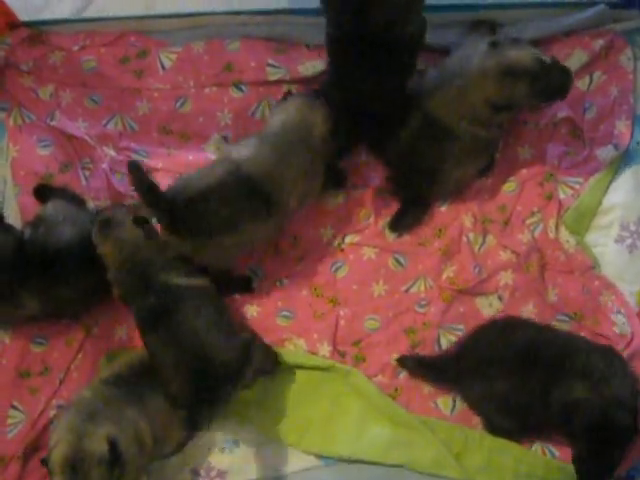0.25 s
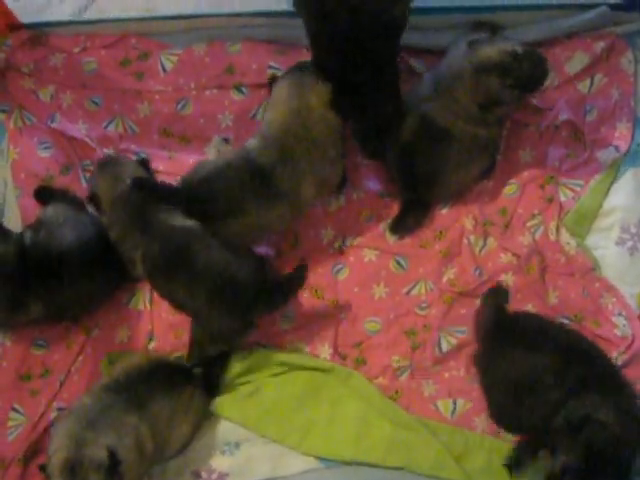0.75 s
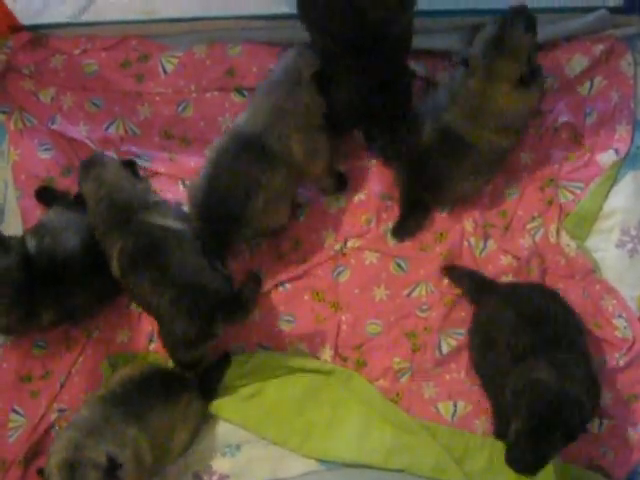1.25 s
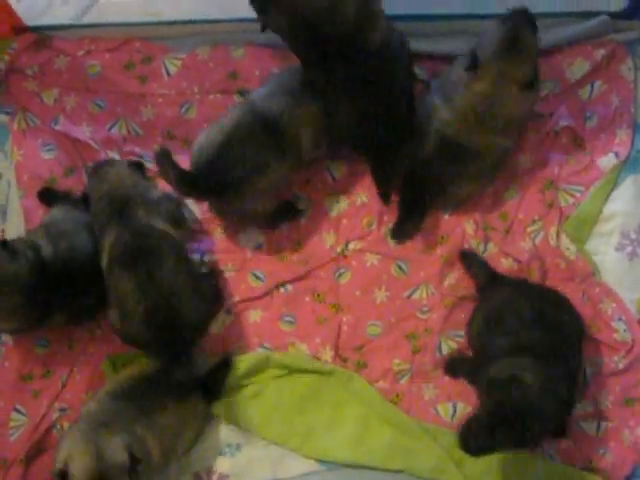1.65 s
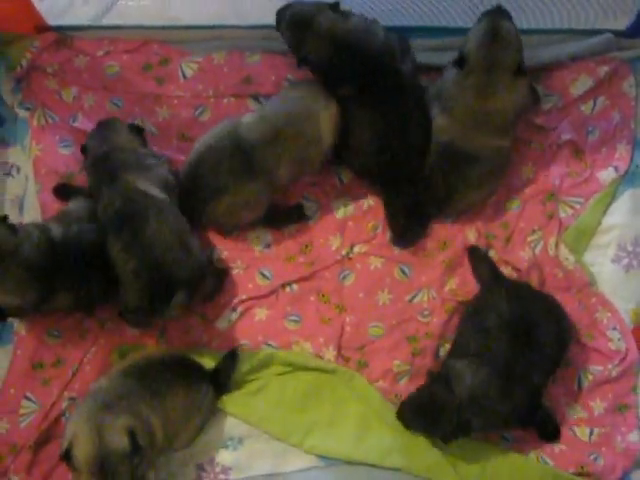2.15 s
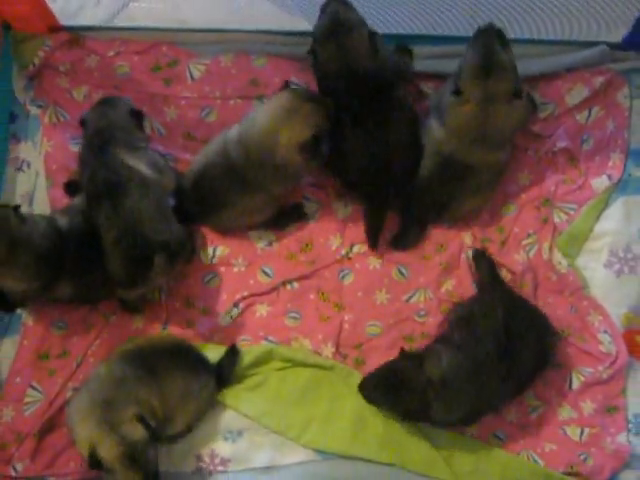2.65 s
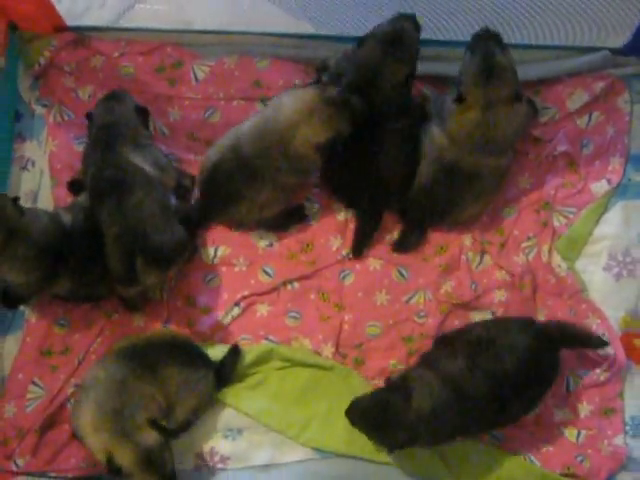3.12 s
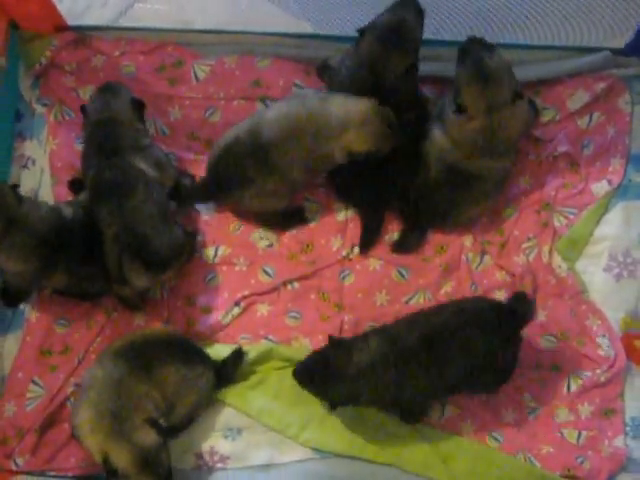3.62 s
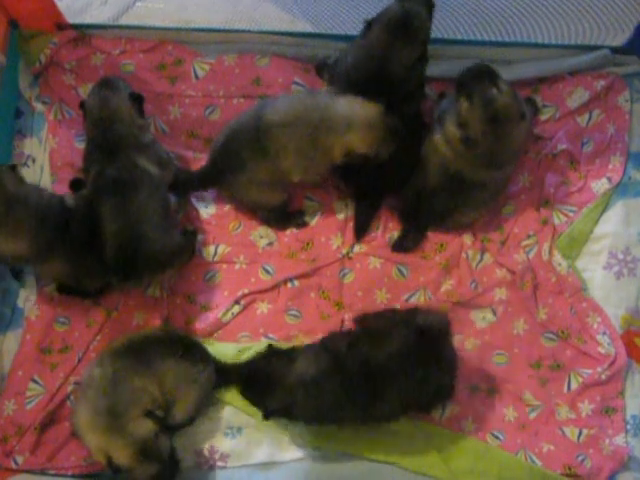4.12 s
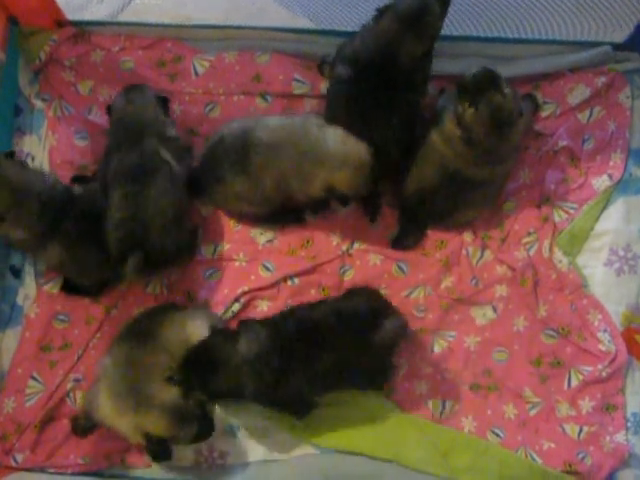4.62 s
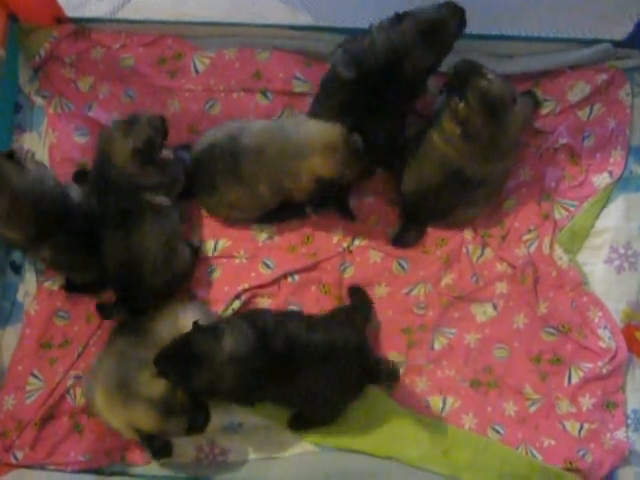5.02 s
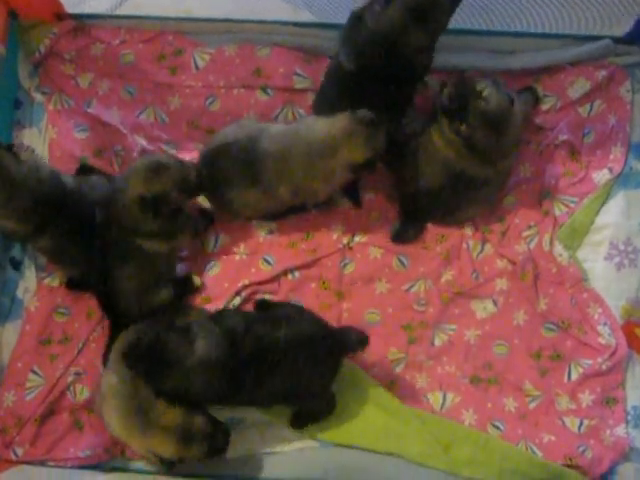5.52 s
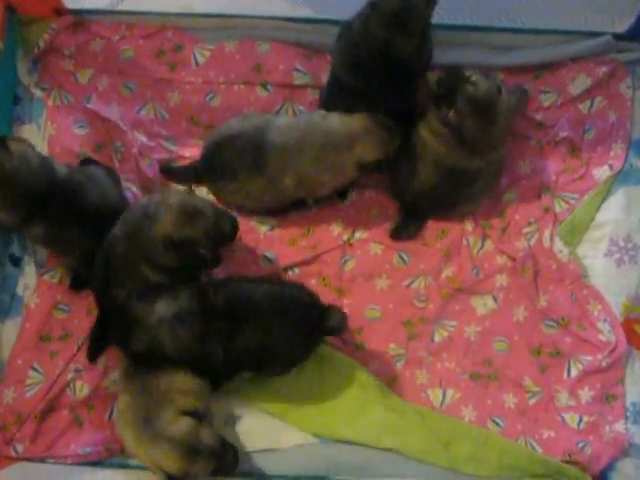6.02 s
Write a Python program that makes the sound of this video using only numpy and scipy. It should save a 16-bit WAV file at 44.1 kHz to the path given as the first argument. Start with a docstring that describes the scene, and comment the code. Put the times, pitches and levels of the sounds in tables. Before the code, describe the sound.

High puppy whimpers, clear arching yelps and flipping squeals crowd together in a furnished room, over soft fabric rubbing and a couple of sharp knocks.

```python
"""In a furnished room, a litter of puppies cries in a fabric playpen, heard through a small camera.
Yelps bend their pitch in one arch, squeals flip to a high register, whimpers hold a pitch and then let it slide.
Each voice is a gliding tone with overtones shaped by throat and mouth; strain turns it into shrieks and rasps.
Paws, claw scrapes and knocks are random thread clicks, filtered and shaped; heavy steps are a low rumble.
Near surfaces and the room echo everything but a faint background noise."""
import sys
import numpy as np
from scipy import signal
from scipy.fft import rfft, irfft
from scipy.io import wavfile
from scipy.ndimage import uniform_filter1d

SR = 44100
rng = np.random.default_rng(int(sys.argv[2]) if len(sys.argv) > 2 else 0)


def master(y):
    """Save y as 16-bit WAV."""
    cut = np.clip(np.atleast_2d(y).T, -1, 1)
    pcm = np.round(cut * 32767)  # scale
    wavfile.write(sys.argv[1], SR, pcm.astype(np.int16))


N = 276507
TIME = np.arange(N) / SR

# whimpers, hoarse and held before the pitch slides; levels are the peaks of the swell:
# (start [s], hold [s], slide [s], first pitch [Hz], held pitch [Hz], pitch aimed at last [Hz],
#  fundamental [dB], overtones [dB])
WHIMPER_ROWS = [ (0, 0.012, 0.029, 1200, 1151, 1090, -29, -45),
                (0.396, 0.07, 0.024, 1260, 1453, 1360, -24, -31),
                (0.711, 0.074, 0.021, 1310, 1404, 1470, -35.5, -45),
                (1.478, 0.072, 0.044, 1180, 1257, 1200, -38.5, -41.5),
                (1.571, 0.041, 0.022, 1213, 1152, 1106, -23, -38.5),
                (1.792, 0.034, 0.073, 1142, 1210, 957, -32.5, -39.5),
                (2.04, 0.078, 0.015, 1256, 1396, 1360, -26, -30),
                (2.293, 0.094, 0.03, 1110, 1271, 1198, -29.5, -35.5),
                (2.613, 0.032, 0.057, 1281, 1151, 997, -25, -37),
                (2.897, 0.049, 0.05, 1148, 1287, 1169, -31, -34.5),
                (3.408, 0.045, 0.084, 1250, 1236, 895, -24.5, -29.5),
                (3.616, 0.012, 0.085, 1349, 1308, 942, -27.5, -36.5),
                (3.664, 0.049, 0.059, 997, 1063, 1014, -19.5, -30.5),
                (3.915, 0.093, 0.067, 1263, 1184, 903.5, -22.5, -33),
                (4.181, 0.1, 0.088, 1210, 1239, 880, -18, -31),
                (4.423, 0.014, 0.064, 1248, 1185, 1077, -40, -40.5),
                (5.125, 0.029, 0.03, 1000, 945, 960, -36.5, -45),
                (5.165, 0.072, 0.027, 1290, 1374, 1330, -39, -53),
                (5.436, 0.05, 0.047, 1261, 1037, 942, -34, -46),
                (5.499, 0.059, 0.063, 992, 927, 810, -39, -45), ]
# how the mouth passes the fundamental of a clear cry: (frequency [Hz], gain [dB])
MOUTH_GAIN = [(1100, -23), (1290, -9.5), (1420, -5.5), (1720, -0.5), (1900, -8)]


def undb(db):
    """Turn decibels into gain."""
    return 10 ** (np.asarray(db) / 20)


def unit(x):
    """Scale to an average (rms) level of 1."""
    return x / np.sqrt(np.mean(x ** 2) + 1e-18)


def gain_at(hz, points):
    """Read the gain of a (frequency [Hz], level [dB]) curve at the given frequencies."""
    f, db = np.transpose(points)
    return undb(np.interp(np.log(hz + 1), np.log(f), db))


def colour(x, points):
    """Filter a signal by a (frequency [Hz], level [dB]) curve and scale it to rms 1."""
    gain = gain_at(np.fft.rfftfreq(len(x), 1 / SR), points)
    return unit(irfft(rfft(x) * gain, len(x)))


def resonate(x, hz, width_hz):
    """Let one resonance ring, with gain 1 at its centre."""
    return signal.lfilter(*signal.iirpeak(hz, hz / width_hz, fs=SR), x)


def wobble(n, hz):
    """Random motion of spread about 1, mostly slower than hz."""
    low_pass = signal.butter(2, hz, fs=SR, output="sos")
    noise = rng.standard_normal(n + SR // 10)  # the extra start lets the filter settle
    return unit(signal.sosfilt(low_pass, noise))[-n:]


def gate(t, start, end, edge_s):
    """Open smoothly at start and close smoothly at end."""
    opening = np.clip(np.minimum(t - start, end - t) / edge_s + .5, 0, 1)
    return np.sin(np.pi / 2 * opening) ** 2


def moments(length_s, count=60):
    """Evenly spaced times through a cry, from its start."""
    return np.linspace(0, length_s, count)


def ramp(t, length_s):
    """Go from 0 to 1 in the given time and stay there."""
    return np.clip(t / length_s, 0, 1)


def background():
    """Faint steady noise of the quiet room, duller towards the treble."""
    # colour of the background: (frequency [Hz], relative level [dB])
    floor = [(40, -11.5), (1000, -10), (7000, -21.5)]
    return undb(-53) * colour(rng.standard_normal(N), floor)


def room(x, t60_s=0.37, wet_db=-9, build_s=0.0045, treble_db=-2):
    """A few close reflections, and a diffuse tail that holds each glide's pitches briefly."""
    # reflections from the floor and pen walls: (delay [s], gain [factor])
    reflections = [(.0047, 0.1), (0.0104, -0.3)]
    t = TIME[:SR * 3 // 4]
    tail = colour(rng.standard_normal(len(t)), [(1500, 0.012), (6000, treble_db)])
    tail = tail * undb(-60 * t / t60_s)
    tail = tail * (1 - np.exp(-(t / build_s) ** 2))
    response = undb(wet_db) * tail / np.sqrt(np.sum(tail ** 2))
    response[0] += 1  # the direct sound
    for delay, gain in reflections:
        response[int(delay * SR)] += gain
    return signal.fftconvolve(x, response)[:N]


def weave(per_s=1700, grain_db=5.5):
    """Threads catch and let go in dense tiny clicks of uneven size."""
    clicks = rng.standard_normal(N) * (rng.random(N) < per_s / SR)
    return clicks * undb(grain_db * rng.standard_normal(N))


def bout(start, length_s, attack_s=0.017, release_s=0.095):
    """A bout of rubbing sets in, holds and dies away."""
    dying = np.exp(-np.maximum(TIME - start - length_s, 0) / release_s)
    return ramp(TIME - start, attack_s) * dying


def paws(stroke_db=4.0, fidget_db=-62.5, scratch_db=-4.5):
    """Paws rub the fabric in uneven strokes; heavy steps rumble in the pen floor."""
    # bouts of rubbing, before the strokes vary them: (start [s], length [s], level [dB])
    rubbing = [(0, 0.39, -40.5), (1.306, 0.24, -38.5), (1.562, 0.29, -32.5), (2.495, 0.28, -43.5),
               (2.975, 1.2, -52), (4.131, 0.54, -44.5)]
    # colour of the rubbed fabric: (frequency [Hz], relative level [dB])
    fabric = [(105, -17), (165, -8.5), (280, -5.5), (480, -13), (1050, -8.5), (2700, -16), (6000, -30)]
    # heavy steps on the pen floor: (start [s], level [dB])
    steps = [(0.039, -50.5), (0.328, -44)]
    cloth = colour(weave(), fabric)
    # the panel's low flapping and the scratch of the weave surge separately
    flap = signal.sosfilt(signal.butter(2, 500, fs=SR, output="sos"), cloth)
    scratch = signal.sosfilt(signal.butter(2, 500, "high", fs=SR, output="sos"), cloth)
    flap = flap * undb(stroke_db * wobble(N, 16))
    scratch = scratch * undb(scratch_db + stroke_db * wobble(N, 5.5))
    # the litter never lies quite still, so some rubbing is always there
    pressure = undb(fidget_db) + sum(undb(db) * bout(s, length) for s, length, db in rubbing)
    weight = sum(undb(db) * gate(TIME, s, s + 0.14, 0.035) for s, db in steps)
    rumble = unit(resonate(wobble(N, 180), 82, 60))
    return (flap - scratch) * pressure + weight * rumble


def scrapes_and_knocks(hz=2100, width_hz=1900):
    """Claw scrapes on the fabric and two short knocks against the pen: each starts at once and dies away."""
    # claw scrapes, then two knocks (the last two rows): (start [s], decay [s], starting level [dB])
    contact_rows = [(1.568, .035, -38), (1.655, .04, -36.5), (1.789, .008, -33), (1.845, .045, -42.5),
                    (3.431, .003, -24.5), (3.445, .004, -23)]
    strength = sum(undb(db) * (TIME > s) * np.exp(-np.abs(TIME - s) / decay_s)
                   for s, decay_s, db in contact_rows)
    ringing = resonate(resonate(weave(), hz, width_hz), hz, 2 * width_hz)
    return strength * unit(ringing)


def cry(rows, jitter, shimmer, split, falter_db, tilt, notch_db=0, ring_hz=0, waver=0.0064, soft_db=14):
    """One cry: the vocal folds glide in pitch; uneven cycles roughen the tone and a half-pitch beat splits it."""
    # rows: (time [s], pitch [Hz], fundamental [dB], overtones [dB])
    # how throat and mouth pass the overtones: (frequency [Hz], gain [dB])
    throat = [(2400, 2), (3000, -2.5), (3750, 5.5), (4400, 2), (4900, 5), (5600, 8), (6200, -3),
              (7500, -50.5)]
    s, *columns = np.transpose(rows)
    span = (TIME > s[0] - .01) & (TIME < s[-1] + .01)
    t = TIME[span]
    hz, tone_db, over_db = (uniform_filter1d(np.interp(t, s, c), SR // 150) for c in columns)
    hz = hz * (1 + waver * wobble(len(t), 55) + jitter * wobble(len(t), 410))
    phase = 2 * np.pi * np.cumsum(hz) / SR
    k = np.arange(2, 8)[:, None]  # overtone numbers
    # as the pitch sinks or the voice softens, the folds slacken and the upper overtones fade
    slack = np.clip((1200 - hz) / 130, 0, 2) + (over_db.max() - over_db) / soft_db
    # a half-closed mouth cuts a valley into the overtones
    valley = undb(notch_db * np.exp(-((k * hz - 3650) / 600) ** 2))
    weights = gain_at(k * hz, throat) * valley / k ** (tilt + slack) * (k * hz < SR / 4)
    weights = weights / np.sqrt(np.sum(weights ** 2, axis=0))
    # the mouth has one resonance, 470 Hz wide, centred by ring_hz (0: none is heard);
    # overtones flare by up to 9.5 dB as they glide through it
    weights = weights * undb(9.5 * np.exp(-((k * hz - ring_hz) / 470) ** 2))
    # an unsteady throat lets every partial swell and sink on its own
    falter = undb(falter_db * np.array([wobble(len(t), 69) for _ in range(len(k) + 1)]))
    overtones = np.sum(falter[1:] * weights * np.sin(k * phase), axis=0)
    tone = undb(tone_db) * falter[0] * np.sin(phase) + undb(over_db) * overtones
    # strong and weak cycles alternate now and then
    swing = 1 + shimmer * wobble(len(t), 92) + split * wobble(len(t), 20) * np.sin(phase / 2)
    # breath noise pulses with the folds
    breath = colour(rng.standard_normal(len(t)) * (1 + np.sin(phase)), throat)
    voice = np.sqrt(2) * tone * swing + undb(over_db - 14) * breath
    out = np.zeros(N)
    out[span] = voice * gate(t, s[0], s[-1], 0.0026)
    return out


def grunt(start, length_s, first_hz, last_hz, tone_db, over_db, close_db=14):
    """The pitch slides while the closing mouth muffles the overtones."""
    return [(start, first_hz, tone_db, over_db), (start + length_s, last_hz, tone_db, over_db - close_db)]


def grunts():
    """Short low grunts, rich in overtones at first."""
    # (start [s], length [s], first pitch [Hz], last pitch [Hz], fundamental [dB], first overtones [dB])
    grunt_rows = [(2.539, 0.039, 402.4, 383, -38, -40), (3.331, .027, 557, 562, -27, -38.5),
                  (3.418, .022, 552, 485, -29, -34), (3.434, 0.025, 270.4, 227, -27, -29.5)]
    return sum(cry(grunt(*row), jitter=0.012, shimmer=0.12, split=0, falter_db=1.5, tilt=0)
               for row in grunt_rows)


def rasp(start, length, hz, db, drop_s=.008, from_hz=1250, swell_db=18):
    """The folds slip into a chaotic, lurching vibration; the higher it is, the harsher."""
    over_db = db - 14 + 9 * np.log2(hz / 850)
    rows = [
        (start - drop_s, from_hz, db - swell_db, over_db - swell_db / 2),
        (start, hz, db, over_db),
        (start + length, hz, db, over_db),
    ]
    return cry(rows, jitter=.058, shimmer=.28, split=.11, falter_db=2, tilt=1.7, waver=.05)


def rasps():
    """Moments when the voice breaks into a rasp."""
    # (start [s], length [s], pitch [Hz], fundamental [dB])
    rasp_rows = [(0.041, 0.023, 804, -21.5), (0.214, 0.037, 805, -22), (1.803, 0.026, 905, -31),
                 (2.06, 0.028, 833, -27), (2.069, 0.05, 1350, -29), (2.31, 0.046, 747, -24.5),
                 (2.329, 0.022, 1147, -29.5), (2.419, 0.0077, 991, -22.5), (2.614, 0.08, 806, -27),
                 (2.908, 0.047, 952, -24.5), (3.123, 0.0076, 892, -23.5), (3.177, 0.008, 1610, -30),
                 (3.965, 0.04, 928, -24), (4.24, 0.0096, 900, -22), (4.27, 0.0077, 876, -25),
                 (4.482, 0.0072, 867, -19), (4.625, 0.039, 1900, -35), (4.855, 0.026, 1573, -29),
                 (5.118, 0.022, 1654, -25), (5.791, 0.013, 988, -29)]
    return sum(rasp(*row) for row in rasp_rows)


def catches(catch_s=0.005, catch_db=-10):
    """Each whimper starts with a short catch of the folds, set 10 dB below its fundamental level."""
    return sum(rasp(start, catch_s, first_hz, tone_db + catch_db, drop_s=0, swell_db=3.5)
               for start, _, _, first_hz, _, _, tone_db, _ in WHIMPER_ROWS)


def whimper(start, hold_s, slump_s, first_hz, held_hz, last_hz, tone_db, over_db, drop_s=.029,
            tone_swell_db=17, over_swell_db=9, release_s=0.042, tone_release_db=6, over_release_db=15):
    """The voice swells as the pitch settles, then the pitch slides towards another one and the voice fades."""
    length_s = hold_s + slump_s
    t = moments(length_s)
    slumped = 1 - np.exp(-(np.maximum(t - hold_s, 0) / drop_s) ** 2)
    hz = first_hz + (held_hz - first_hz) * ramp(t, hold_s) + (last_hz - held_hz) * slumped
    peak_s = max(length_s - release_s, length_s / 2)
    early, late = 1 - ramp(t, peak_s), ramp(t - peak_s, release_s)
    tone = tone_db - tone_swell_db * early - tone_release_db * late
    over = over_db - over_swell_db * early - over_release_db * late
    return np.column_stack([start + t, hz, tone, over])


def whimpers():
    """Hoarse whimpers from a half-closed mouth, which cuts a deep valley into their overtones."""
    return sum(cry(whimper(*row), jitter=.012, shimmer=.16, split=.1, falter_db=2.5,
                   tilt=1.0, notch_db=-21, ring_hz=6350) for row in WHIMPER_ROWS)


def shriek(start, strain_s, release_s, first_hz, turn_hz, last_hz, tone_db, over_db, strain_bend=1.7,
           attack_s=0.0077, attack_db=11, fade_db_per_s=190):
    """The pitch moves ever faster to a turning point; overtones flare at once and fade after the turn."""
    t = moments(strain_s + release_s)
    strained = ramp(t, strain_s) ** strain_bend
    released = ramp(t - strain_s, release_s)
    hz = first_hz + (turn_hz - first_hz) * strained + (last_hz - turn_hz) * released
    over = over_db - attack_db * (1 - ramp(t, attack_s)) - fade_db_per_s * np.maximum(t - strain_s, 0)
    return np.column_stack([start + t, hz, np.full_like(t, tone_db), over])


def shrieks_and_yelp_end():
    """Strained, rough shrieks, and the falling, overtone-rich end of one yelp."""
    # the yelp's end (first row), then shrieks:
    # (start [s], strain [s], release [s], first pitch [Hz], turning pitch [Hz], last pitch [Hz],
    #  fundamental [dB], overtones [dB], mouth resonance [Hz])
    strained_rows = [ (3.212, 0.021, 0.0098, 1698, 1183, 1130, -41.5, -33, 2500),
                     (5.064, 0.04, 0.016, 1146, 1219, 1450, -39, -28, 4880),
                     (5.266, 0.037, 0.023, 974, 1476, 1568, -31, -26.5, 3030),
                     (5.81, 0.024, .032, 1111, 1250, 1121, -34, -25.5, 4650),
                     (5.874, 0.014, 0.14, 1350, 1382, 1104, -42, -33, 2630),
                     (6.213, 0.012, 0.089, 1446, 1352, 1386, -58, -32, 2800), ]
    return sum(cry(shriek(*row), jitter=.011, shimmer=.17, split=.13, falter_db=2.5,
                   tilt=1, ring_hz=ring) for *row, ring in strained_rows)


def squeal(start, climb_s, high_s, first_hz, flip_hz, high_hz, last_hz, low_db, high_db, over_db, flip_s=0.014,
           climb_bend=1.5, high_bend=2.5, strain_db_per_s=150, relax_db_per_s=130):
    """The pitch climbs until the voice flips to a thin high register; the overtones are strongest at the flip."""
    t = moments(climb_s + high_s)
    since = t - climb_s
    low = flip_hz + (first_hz - flip_hz) * (1 - ramp(t, climb_s)) ** climb_bend
    high = high_hz + (last_hz - high_hz) * ramp(since, high_s) ** high_bend
    flipped = ramp(since, flip_s)
    low_tone_db = low_db + 20 * np.log10(gain_at(low, MOUTH_GAIN))
    tone = (1 - flipped) * low_tone_db + flipped * high_db
    over = over_db - strain_db_per_s * np.maximum(-since, 0) - relax_db_per_s * np.maximum(since - flip_s, 0)
    onset_db = 10 * (ramp(t, flip_s) - 1)  # the voice takes as long to start as to flip
    return np.column_stack([start + t, low + flipped * (high - low), tone + onset_db, over + onset_db])


def squeals():
    """Squeals that climb, then flip into a higher register."""
    # (start [s], climb [s], high part [s], first pitch [Hz], flip pitch [Hz], high pitch [Hz],
    #  last pitch [Hz], low register before mouth gain [dB], high register [dB],
    #  strongest overtones [dB], mouth resonance [Hz])
    squeal_rows = [ (0.203, .065, 0.048, 1813, 2055, 2370, 2270, -20, -27, -47.5, 3750),
                   (0.479, 0.053, 0.13, 1481, 1816, 2173, 2395, -14, -24.5, -28.5, 3650),
                   (0.793, 0.055, 0.15, 1610, 1750, 2177, 1930, -19.5, -30.5, -26.5, 3510),
                   (5.492, 0.048, .1, 1464, 1758, 2035, 1375, -18, -24, -34, 4140),
                   (5.804, 0.055, .125, 1197, 1632, 2018, 1448, -22, -30, -32, 3880),
                   (6.156, .064, 0.061, 1142, 1706, 2186, 2160, -14.5, -26, -27.5, 3660), ]
    return sum(cry(squeal(*row), jitter=.006, shimmer=.06, split=.03, falter_db=1.5,
                   tilt=2.87, notch_db=-4, ring_hz=ring) for *row, ring in squeal_rows)


def yelp(start, rise_s, fall_s, first_hz, top_hz, last_hz, tone_db, over_db, rise_bend=2.1, fall_bend=1.9,
         tire_db_per_s=75, tire_after_s=0.035, effort_db_per_octave=28, over_tire_db_per_s=50,
         attack_s=0.017, attack_db=13):
    """Effort bends the pitch and brightens the voice; the tone blooms in the mouth resonance, then tires."""
    t = moments(rise_s + fall_s)
    rising = (first_hz - top_hz) * (1 - ramp(t, rise_s)) ** rise_bend
    falling = (last_hz - top_hz) * ramp(t - rise_s, fall_s) ** fall_bend
    hz = top_hz + rising + falling
    effort_db = -attack_db * (1 - ramp(t, attack_s)) - tire_db_per_s * np.maximum(t - tire_after_s, 0)
    tone = tone_db + 20 * np.log10(gain_at(hz, MOUTH_GAIN)) + effort_db
    over = over_db + effort_db_per_octave * np.log2(hz / top_hz)
    over = over - over_tire_db_per_s * np.maximum(t - rise_s, 0)
    return np.column_stack([start + t, hz, tone, over])


def yelps():
    """Clear yelps, the steadiest of the voices."""
    # (start [s], rise [s], fall [s], first pitch [Hz], middle pitch [Hz], last pitch [Hz],
    #  fundamental before mouth gain and effort [dB], overtones at the middle pitch [dB], mouth resonance [Hz])
    yelp_rows = [ (0.99, 0.016, 0.09, 1754, 1740, 1678, -29.5, -53.5, 4900),
                 (1.17, .044, 0.12, 1375, 1763, 1274, -15, -32.5, 4660),
                 (3.141, .068, 0.019, 1325, 1668, 1404, -12.5, -33, 3430),
                 (4.52, 0.043, 0.0013, 1245, 1552, 1570, -9.5, -37, 5050),
                 (4.572, 0.028, 0.056, 1576, 1671, 1297, -15, -36.5, 3420),
                 (4.823, .093, 0.066, 1300, 1780, 1149, -12, -39, 5360),
                 (5.309, 0.04, 0.13, 1498, 1598, 1170, -18.5, -44.5, 3200), ]
    return sum(cry(yelp(*row), jitter=.003, waver=.003, shimmer=.025, split=.02, falter_db=1,
                   tilt=1.43, notch_db=-6.5, ring_hz=ring) for *row, ring in yelp_rows)


def puppies():
    """All the voices of the litter together."""
    clear = yelps() + squeals()
    rough = whimpers() + catches() + shrieks_and_yelp_end() + grunts() + rasps()
    return clear + rough


def scene():
    """Voices, paws, scrapes and knocks in the room, over its faint background."""
    return (background() + room(paws() + scrapes_and_knocks() + puppies()))[None]


def record(dry, mirror_db=-5, loud_limit=.35, recorder_hz=12000, top_hz=7500):
    """The camera holds down the loudest cries, mirrors the treble about 6 kHz and cuts the top steeply."""
    envelope = uniform_filter1d(np.abs(dry), SR // 200, axis=-1) * np.pi / 2
    held = dry * loud_limit / np.maximum(envelope, loud_limit)
    # a low sampling rate folds each treble frequency to the other side of its half
    band = signal.butter(4, [4700, 7300], "bandpass", fs=SR, output="sos")
    treble = signal.sosfilt(band, held)
    mirrored = undb(mirror_db) * 2 * treble * np.cos(2 * np.pi * recorder_hz * TIME)
    softener = signal.firwin(numtaps=41, cutoff=6600, fs=SR)
    soft = signal.fftconvolve(held + mirrored, softener[None], "same")
    soft = soft * np.minimum((N / SR - TIME) / .005, 1) ** 2  # fade out over the last 5 ms
    return signal.sosfilt(signal.ellip(8, .2, 70, top_hz, fs=SR, output="sos"), soft)


dry = scene()
out = record(dry)
master(out)
```